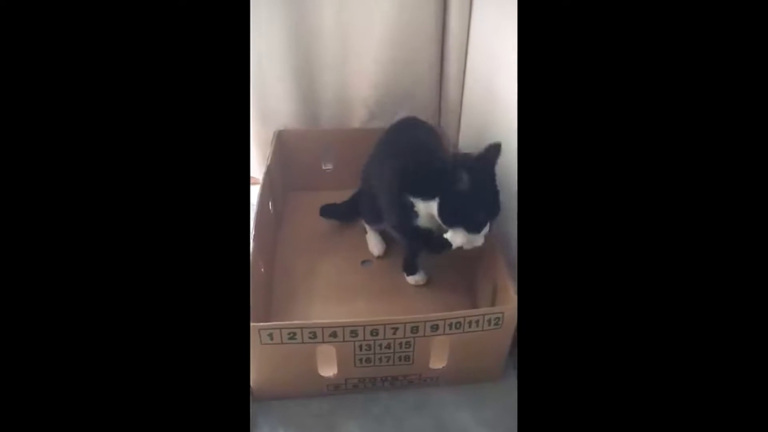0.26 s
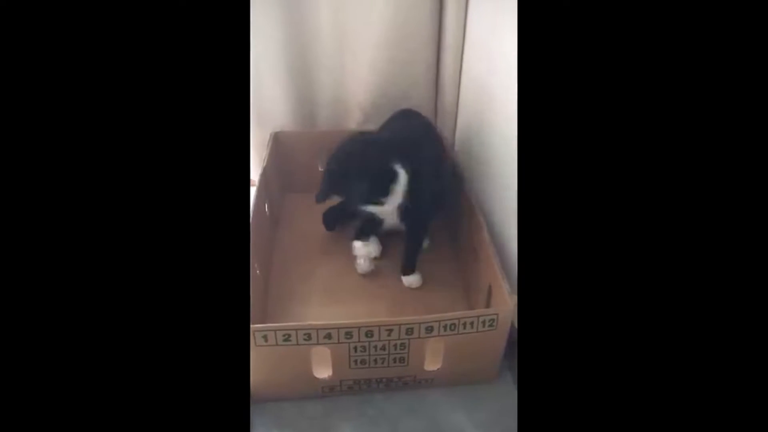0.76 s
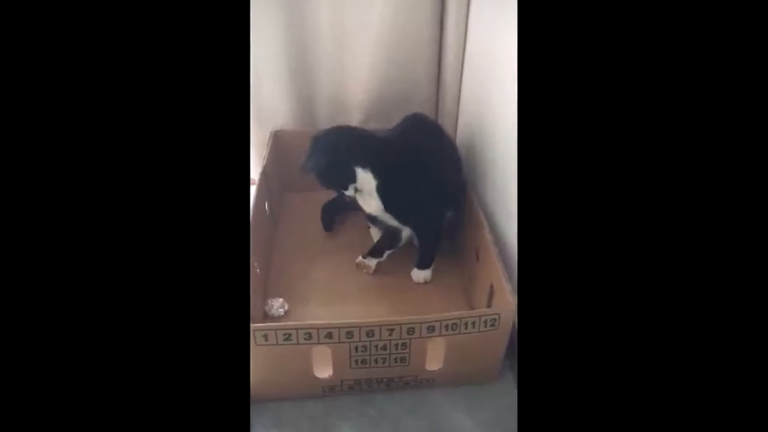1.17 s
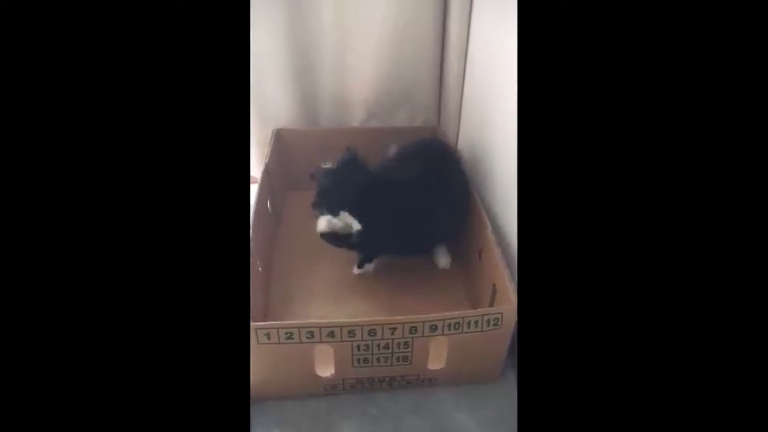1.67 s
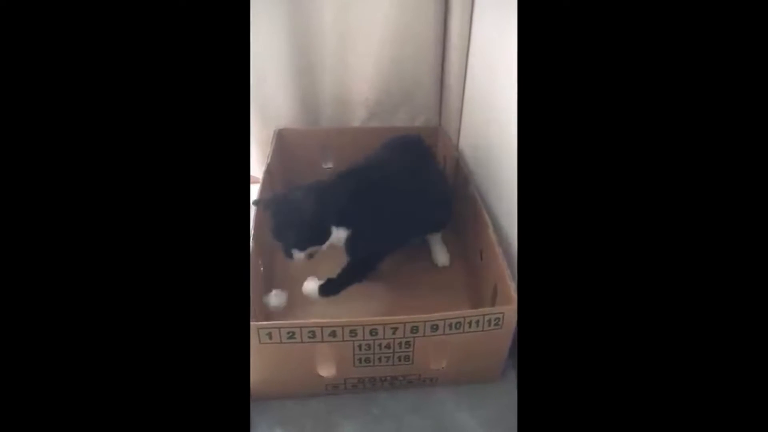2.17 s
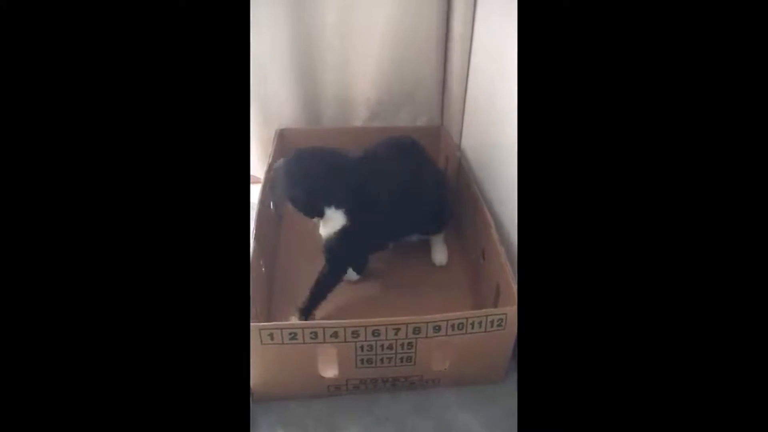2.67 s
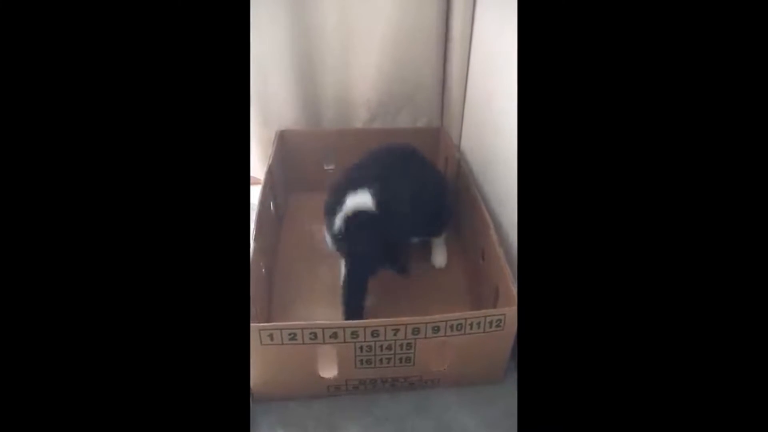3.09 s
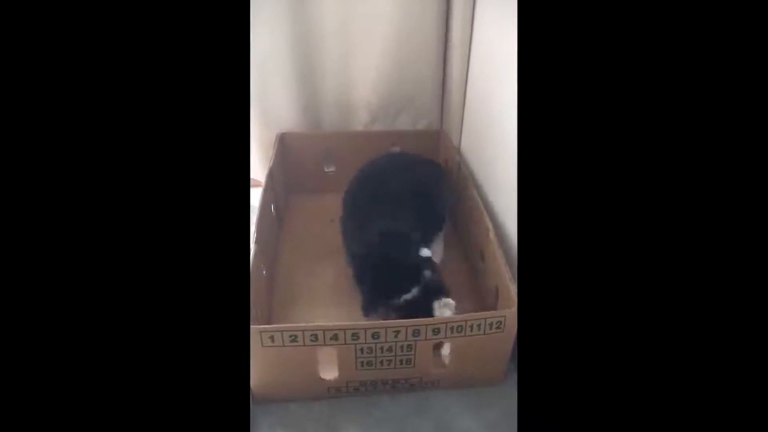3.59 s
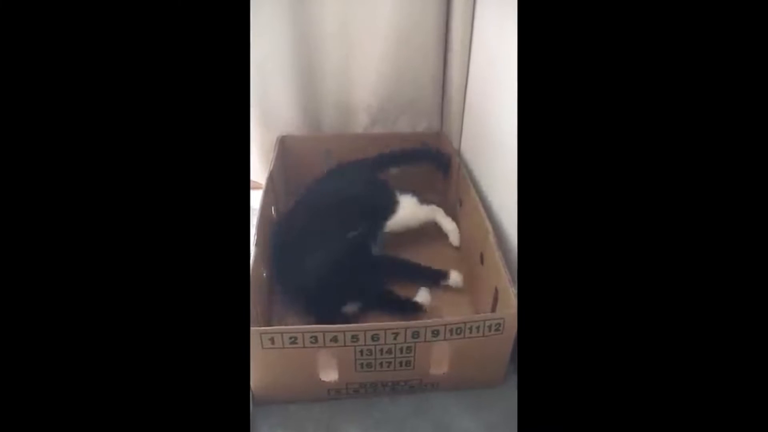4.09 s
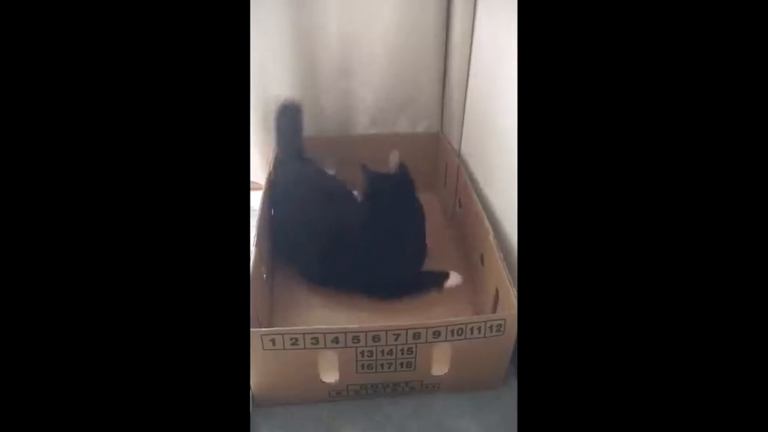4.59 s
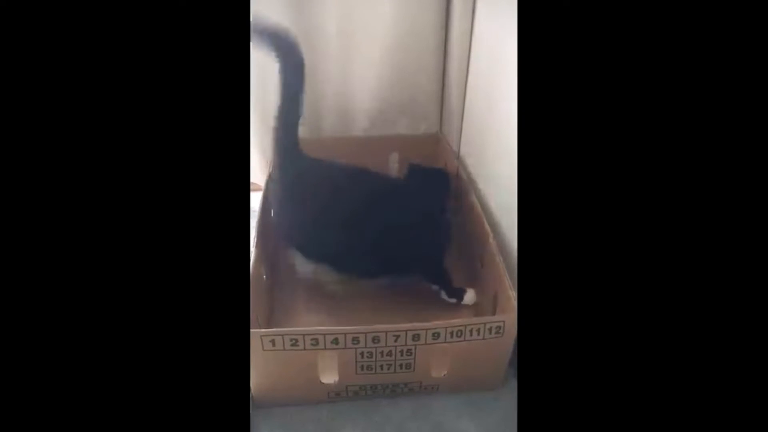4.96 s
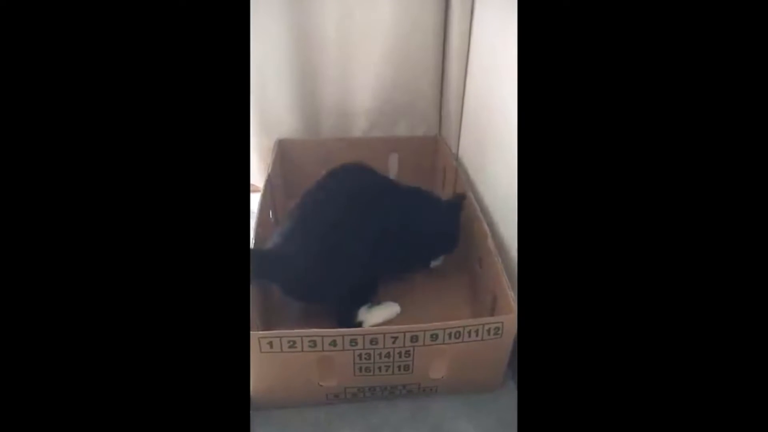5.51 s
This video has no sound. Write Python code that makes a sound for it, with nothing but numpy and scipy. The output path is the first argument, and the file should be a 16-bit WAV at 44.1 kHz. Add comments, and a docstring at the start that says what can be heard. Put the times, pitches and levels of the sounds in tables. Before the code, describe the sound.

A phone about a step away picks up a cardboard box being knocked and scratched by a cat and its ball. Isolated clacks and faint rolling give way to quick rattling bursts, dull panel thuds, gritty claw drags and tiny squeaks, densest in the second half, before fading to faint ticks over soft room rumble.

```python
"""First a low room rumble and faint fur hiss, then a cat chases a small hard ball around an open cardboard box.
Ball, paws and claws knock the panels: pushed modes ring, then loose board shudders as dull, dying noise.
Hard knocks carry short pitched rings of struck board, and low thuds join; rolling drives the modes with grit.
Claws and fur scrape the board as filtered grit in clumps, with snags, tearing and short squeaks.
A phone a step away picks it up with the room's echoes and rounds off the loudest knocks."""
import sys
import numpy as np
from scipy import signal
from scipy.fft import rfft, irfft
from scipy.io import wavfile

SR = 44100
rng = np.random.default_rng(int(sys.argv[2]) if len(sys.argv) > 2 else 0)


def master(y):
    """Save y as 16-bit WAV."""
    cut = np.clip(np.atleast_2d(y).T, -1, 1)
    pcm = np.round(cut * 32767)  # scale
    wavfile.write(sys.argv[1], SR, pcm.astype(np.int16))


N = 253001

# Knocks of ball, paw and claw; boom, rap and tick are relative to the level:
# (time [s], level [dB], boom of big panels [dB], rap of the edge [dB], surface tick [dB], panel pitch [Hz])
KNOCKS = [(0.438, -39, -7, 20, -5, 1080), (0.584, -11, -5.5, 1.5, 0, 910), (0.718, -21.5, 1, 0.5, 0, 510),
          (0.798, -30.5, 6, 6.5, 4, 500), (0.856, -34, 7.5, 0, -2, 510), (0.897, -30.5, -4, -29, -5, 490),
          (0.936, -29.5, -2, -15, 2, 704), (0.963, -24, -24, 11.5, 4.5, 1180),
          (1.074, -18.5, -5, -22, 0, 580), (1.129, -19.5, -19, -13, -5, 540), (1.181, -34, 1, 8, 6, 444),
          (1.195, -35.5, 0, -12, 12, 614), (1.287, -39.5, 5.5, 12, -13, 394),
          (1.486, -22.5, -6, 9, -17, 910), (1.505, -9.5, 1.5, -0.5, -2, 690),
          (1.673, -31, -2, -20, -11, 950), (1.724, -30.5, 10, -4, -1, 430), (2.058, -23, -5, 14, -8, 1430),
          (2.071, -36.5, -3.5, -5, -19, 1520), (2.313, -29.5, 3, 3, 10.5, 610),
          (2.376, -10, -13, -10, -3, 744), (2.391, -17, -20, -18, -15, 830),
          (2.404, -15.5, -22, -20, -28, 620), (2.48, -17, -27, -1.5, -3, 710),
          (2.493, -24, -1, -17, -13, 855), (2.509, -25, -22, -34, -29, 794), (2.661, -32, -7, 5, 9.5, 1390),
          (2.678, -18.5, 0.5, -12, 1, 450), (2.717, -25, -18, -16, -13, 1470),
          (2.743, -21, 0, -17, 0, 1180), (2.794, -28, -6, 2, -17, 1560), (2.872, -29, -18, 9, 3.5, 1450),
          (2.887, -17, -3, 14.5, -7, 1520), (2.898, -9.5, -3, -13, -7.5, 496),
          (2.914, -20.5, -1, 16.5, -21, 1360), (3.04, -14, -8, -27, 1, 770),
          (3.059, -10, -31, -14, -5.5, 1010), (3.073, -18, -22, -12, -12, 890),
          (3.125, -21.5, -20, 3, -8, 1140), (3.239, -22.5, -21, -14, 1.5, 577),
          (3.295, -10, -5, 0.5, -8, 666), (3.373, -20.5, 6, 15, 2, 1660), (3.422, -9, -26, -2, -11.5, 650),
          (3.438, -13, -13, -8, -6, 684), (3.465, -5, -25, 2, -4, 1500),
          (3.711, -27.5, -11, -20, -29, 1160), (3.84, -12.5, -27, -5.5, -11.5, 513),
          (3.877, -22, -27, 1, 1, 434), (3.926, -29, -17, 5, -22, 414), (3.949, -6.5, -12, -1.5, -20, 850),
          (3.962, -5.5, -26, -22, -10, 1050), (3.983, -17, -18, -12, 0, 476), (4.01, -11, -8, 3.5, -5, 766),
          (4.136, -10.5, -30, 9, -1.5, 1170), (4.144, -7.5, -8, -10, -11, 935),
          (4.249, -15, -5, -20, -9, 416), (4.333, -13, -23, 3, -11, 1350),
          (4.335, -9.5, -39, -10, -8, 1220), (4.343, -24.5, -32, 15.5, -22, 1490),
          (4.388, -13, -37, -22, -7, 645), (4.448, -12, 14, 5.5, -8, 400),
          (4.481, -16.5, -21, -14, -5, 1150), (4.544, -26.5, 1, 9, 2, 1440),
          (4.748, -6.5, -32, -11, -34, 583), (4.799, -33, 19.5, 11, -1, 457),
          (4.825, -10, -1, 6.5, 0, 1270), (4.986, -19.5, -40, 8, -4, 1080),
          (5.035, -34, -23, -15, -15, 1210), (5.05, -10.5, -15, -19, -7, 965),
          (5.064, -10, -21, 2.5, -10, 866), (5.137, -12, 2, 3.5, -4, 760), (5.169, -19, -17, -25, -21, 434),
          (5.205, -10, -25, 1, -31, 840), (5.213, -9.5, -20, -20, -28, 770),
          (5.234, -13, -19, -11, -2, 483), (5.32, -18, -1, 9, -10, 643), (5.455, -33, -19, 12, -6, 400)]
# Modes of the cardboard box: (frequency [Hz], relative level [dB], t60 [s])
BOX_MODES = [(166, 2, 0.0041), (225.6, -8, 0.059), (280, -1.5, 0.065), (358.3, -13, 0.25),
             (414, 2.5, 0.018), (483.5, -18.5, 0.14), (561, -13, 0.14), (658, -7, 0.078), (710, -45, 0.045),
             (863.7, -5.5, 0.054), (930.6, -13.5, 0.1), (1070, 0, 0.021), (1438, -6.5, 0.032),
             (1660, -9.5, 0.041), (2130, -17, 0.026), (2520, -9, 0.0063), (2980, 3.5, 0.00024)]
KNOCK_S = 0.0024   # decay constant of the contact
KNOCK_SCATTER_DB, KNOCK_DRIVE_DB = 1, 4.5   # spread from mode to mode; drive added to every mode
LOAD_DETUNE = 0.05   # the shifting cat bends every mode by about this share from knock to knock
SPOT_DB, SPOT_T60_S = -2.5, 0.025   # short ring of the board right under the blow


def knocks(size=6144):
    """Where a knock lands sets which modes it wakes; the load on the box detunes them each time."""
    blows = contacts(np.full(len(KNOCKS), KNOCK_S), chatter=0.082)
    scatter, bend = rng.standard_normal((len(KNOCKS), len(BOX_MODES), 2)).T[..., None]
    _, knock_db, *_, panel_hz = np.transpose(KNOCKS)[..., None]
    spot = from_db(knock_db + SPOT_DB) * response(panel_hz, SPOT_T60_S, size)
    body = 0
    for k, (hz, level_db, t60) in enumerate(BOX_MODES):
        strength = from_db(level_db + KNOCK_SCATTER_DB * scatter[k] + KNOCK_DRIVE_DB)
        gain = mode_sign(k) * reach(hz)[:, None] * strength
        body = body + gain * response(hz * (1 + LOAD_DETUNE * bend[k]), t60, size)
    # the box gets the full contact, the spot a bare click
    rows = irfft(rfft(blows, size) * body + spot, size)
    return train(KNOCKS, rows, np.ones(len(KNOCKS)))


BOOM_HZ, RAP_HZ = 281, 2185   # centres of boom and rap
BOOM_SLOPE_DB, PANEL_SLOPE_DB, RAP_SLOPE_DB = 10, 12, 14   # loss per octave away from the centre


def reach(hz):
    """How strongly each knock drives a mode: boom and panel fall off both ways, the rap only downwards."""
    _, knock_db, boom_db, rap_db, _, panel_hz = np.transpose(KNOCKS)
    boom = from_db(boom_db - BOOM_SLOPE_DB * abs(np.log2(hz / BOOM_HZ)))
    panel = from_db(-PANEL_SLOPE_DB * abs(np.log2(hz / panel_hz)))
    rap = from_db(rap_db - RAP_SLOPE_DB * max(0, np.log2(RAP_HZ / hz)))
    return from_db(knock_db) * np.sqrt(boom ** 2 + panel ** 2 + rap ** 2)


PUSH_CYCLES = 0.19   # a paw or ball pushes each mode with a time constant of this share of its cycle


def push_pole(hz):
    """Low-pass pole of a soft push: the force fades over a share of the mode's cycle."""
    return np.exp(-hz / (PUSH_CYCLES * SR))


def response(hz, t60, size):
    """Spectrum of a mode pushed softly: a low-passed click into a dying sine."""
    z = np.exp(-2j * np.pi * np.arange(size // 2 + 1) / size)
    r, w = from_db(-60 / (t60 * SR)), 2 * np.pi * hz / SR
    soft = push_pole(hz)
    push = 1.07 * (1 - soft) / (1 - soft * z)
    return push * np.sin(w) * z / (1 - 2 * r * np.cos(w) * z + (r * z) ** 2)


def mode_sign(k):
    """Neighbouring pairs of modes move the near wall in opposite senses."""
    return (-1) ** (k // 2)


SHUDDER_DB = -19.5   # relative to the knock
SHUDDER_T60_S, SHUDDER_RISE_S, SHUDDER_HZ = 0.3, 0.0075, (227, 1080)   # decay, rise constant, band
# Hollow of the box, resonances added to the shudder: (frequency [Hz], width [Hz], added level [dB])
HOLLOW = [(282, 100, 6), (434, 35, 8), (602, 38, 4), (852, 150, 11)]


def shudder():
    """After each knock loose flaps and walls rumble as dull, dying noise in the hollow, new every time."""
    t = np.arange(SR // 4) / SR
    band = signal.butter(2, SHUDDER_HZ, "band", fs=SR, output="sos")
    noise = signal.sosfilt(band, rng.standard_normal((len(KNOCKS), len(t))))
    hollow = noise.copy()
    for hz, width_hz, level_db in HOLLOW:
        hollow += from_db(level_db) * signal.lfilter(*signal.iirpeak(hz, hz / width_hz, fs=SR), noise)
    envelope = from_db(-60 * t / SHUDDER_T60_S) * (1 - np.exp(-t / SHUDDER_RISE_S))
    return train(KNOCKS, rms_one(hollow) * envelope, from_db(np.transpose(KNOCKS)[1] + SHUDDER_DB))


def rolling(rumble_db):
    """The rolling ball meets uneven grit, whose lumpy force keeps the box modes ringing."""
    grain = from_db(rumble_db - 27.5 + 0.3 * lumps(64.0)) * grit(900.0, spread_db=9.0)
    out = np.zeros(N)
    for k, (hz, level_db, t60) in enumerate(BOX_MODES):
        soft = push_pole(hz)
        drive = 1.14 * (1 - soft) * min(1, (900 / hz) ** 2)   # weaker above 900 Hz
        force = signal.lfilter([drive], [1, -soft], grain)
        out += mode_sign(k) * from_db(level_db) * ring(force, hz, t60)
    return out


def box(rumble_db):
    """Knocks, shudder and rolling leave the box; thin panels radiate little deep bass."""
    out = knocks() + shudder() + rolling(rumble_db)
    return signal.sosfilt(signal.butter(2, 130, "high", fs=SR, output="sos"), out)


# Short pitched rings of struck board under hard knocks, and low thuds:
# (time [s], peak level [dB], pitch [Hz], t60 [s])
RINGS_AND_THUDS = [(0.5855, -5, 524, 0.018), (0.588, -28.5, 194, 0.049), (1.505, -18.5, 248, 0.03),
                   (1.57, -30, 307, .06), (1.722, -25, 170, 0.062), (1.729, -26, 281, 0.093),
                   (1.739, -36.5, 65.4, 0.079), (2.071, -37, 122, 0.048), (2.317, -28, 273, 0.11),
                   (2.362, -32, 280, 0.069), (2.377, -18.5, 728, 0.057), (2.378, -17, 1515, 0.018),
                   (2.38, -23, 279, 0.075), (2.389, -19.5, 850, 0.053), (2.682, -23.5, 268, 0.23),
                   (3.296, -13.5, 710, 0.03), (3.3, -21, 394, 0.054), (3.378, -19, 230, 0.028),
                   (3.4235, -4.5, 618, 0.02), (3.466, -5, 1390, 0.023), (3.949, -1, 480, 0.0097),
                   (3.952, -16.5, 178, 0.022), (3.988, -17, 470, 0.019), (3.995, -13.5, 288, 0.071),
                   (4.1363, -5, 1100, 0.0086), (4.252, -12.5, 305, 0.11), (4.349, -35, 77, 0.043),
                   (4.434, -25, 109, 0.034), (4.449, -3, 371, 0.033), (4.481, -12.5, 1150, 0.018),
                   (4.789, -34, 77.4, .075), (4.83, -29.5, 77, 0.05), (5.051, -7.5, 940, 0.023),
                   (5.052, -9.5, 298, 0.13), (5.063, -11.5, 900, 0.05), (5.066, -10.5, 308, 0.061),
                   (5.14, -17, 294, 0.069), (5.176, -29.5, 120, 0.035), (5.238, -13, 267, 0.11),
                   (5.327, -19.5, 272, 0.077), (5.338, -26.5, 134, 0.045)]
RING_RISE_CYCLES = 0.51   # time constant of the build-up


def rings_and_thuds():
    """Each is a single sine that builds within about a cycle and dies away."""
    t = np.arange(SR // 5) / SR
    _, peak_db, hz, t60 = np.transpose(RINGS_AND_THUDS)[..., None]
    envelope = from_db(-60 * t / t60) * (1 - np.exp(-t * hz / RING_RISE_CYCLES))
    rows = np.sin(2 * np.pi * hz * t) * envelope
    return train(RINGS_AND_THUDS, peak_one(rows), from_db(peak_db))


# Lone claw snags: (time [s], peak level [dB], brightest frequency [Hz])
SNAGS = [(0.426, -26, 5830), (0.9164, -44, 3280), (0.9824, -22, 5460), (0.994, -45, 7500),
         (1.016, -25, 3960), (1.0277, -22.5, 10000), (1.044, -21.5, 2440), (1.141, -33, 5000),
         (1.1583, -36, 6500), (1.194, -29, 4870), (1.229, -29, 3250), (1.248, -36, 3320),
         (1.268, -31, 3040), (1.2836, -32, 3420), (1.617, -35, 5500), (1.6726, -37, 6040),
         (2.4958, -27, 4830), (2.542, -37, 2980), (2.568, -36, 2950), (2.588, -32, 3340),
         (2.6003, -24, 5900), (2.6206, -20, 9300), (2.6474, -33, 3000), (2.7, -27, 3390),
         (2.8374, -18.5, 3550), (2.9756, -30, 3330), (3.2515, -27, 6470), (3.5372, -25, 5700),
         (3.56, -23, 3540), (4.0605, -19.5, 4960), (4.09, -24, 5330), (4.105, -30, 2740),
         (4.341, -16, 3180), (4.364, -34, 5500), (4.3835, -18, 3900), (4.603, -29, 3370),
         (4.6227, -35, 7240), (5.0135, -27, 3530), (5.592, -28.5, 6260), (5.636, -35, 3670),
         (5.702, -40, 6310), (5.7176, -37, 3600), (5.7314, -36, 7160)]
SNAG_S, SNAG_SHARPNESS = 0.0031, 14.0   # decay constant; quality factor of the bright spot
KNOCK_TICK_S, KNOCK_TICK_SHARPNESS, KNOCK_TICK_HZ = 0.0039, 3.0, 3140   # those that come with a knock
TICK_RISE_S = 0.00013   # fibres tear one after another


def ticks():
    """Short bursts of tearing fibre, alone or on top of a knock, each with a bright spot."""
    events = [(*row, SNAG_SHARPNESS, SNAG_S) for row in SNAGS]
    for s, level_db, _, _, tick_db, _ in KNOCKS:
        events.append((s, level_db + tick_db, KNOCK_TICK_HZ, KNOCK_TICK_SHARPNESS, KNOCK_TICK_S))
    _, peak_db, bright_hz, sharpness, decay_s = np.transpose(events)
    rise = 1 - np.exp(-np.arange(1, SR // 25 + 1) / (TICK_RISE_S * SR))
    treble = signal.butter(2, 2000, "high", fs=SR, output="sos")
    bursts = signal.sosfilt(treble, contacts(decay_s, chatter=0.81) * rise)
    for burst, hz, q in zip(bursts, bright_hz, sharpness):
        burst += 0.63 * q * signal.lfilter(*signal.iirpeak(hz, q, fs=SR), burst)
    return train(events, peak_one(bursts), from_db(peak_db))


# Shuffling of cat and ball, as curves:
# (time [s], fur hiss level [dB], relative rumble level of rolling and shoving [dB])
SHUFFLING = [(0.0, -67.5, -70), (0.4, -65.5, -83), (0.62, -67, -51), (0.75, -70, -59), (0.96, -63, -31),
             (1.13, -65, -30.5), (1.32, -60.5, -36.5), (1.71, -56, -81), (1.87, -59.5, -48),
             (2.15, -64.5, -60), (2.36, -74, -56), (2.49, -63.5, -38), (2.82, -49, -36.5), (3.09, -49, -28),
             (3.4, -49.5, -29), (3.57, -76, -59), (3.85, -43, -36), (4.04, -50.5, -48), (4.37, -45, -19.5),
             (4.6, -43.5, -30.5), (4.82, -47.5, -37), (5.19, -45, -35), (5.49, -51, -57),
             (5.73, -58, -44.5)]


def shuffling():
    """Hiss and rumble levels glide from point to point as cat and ball move."""
    s, *columns = np.transpose(SHUFFLING)
    return [np.interp(np.arange(N) / SR, s, column) for column in columns]


# Spectra of board surface, dragging rasp and tearing: (frequency [Hz], relative density [dB per Hz])
HISS_SPECTRUM = [(1500, 3), (3000, 6.5), (4700, 4), (5300, 6), (8300, 5.5), (10300, 0.5), (11500, 2),
                 (13500, 8)]
RASP_SPECTRUM = [(600, 16.5), (1200, 11.5), (1700, 13.5), (2400, 8.5), (3500, 3.5), (6000, -66)]
TEAR_SPECTRUM = [(600, -7), (1200, 23), (2400, -7.5), (4500, 8), (8000, -10)]
RASP_DB, RASP_FROM_RUMBLE = -4, 0.33   # the rasp follows a level between hiss and rumble, then this offset
CRACKLE_DB = -7   # relative to the hiss
TEAR_PER_S, TEAR_DB = 820, -6   # coarse tearing, relative to the rasp of the strokes


def scraping(hiss_db, rumble_db):
    """Fine dense grit gives the hiss, coarser slips the rasp, sparse snags the crackle; all in clumps."""
    rasp_db = RASP_DB + hiss_db + RASP_FROM_RUMBLE * (rumble_db - hiss_db)
    grip = lumps(100.0)
    stroke_hiss, stroke_rasp = strokes()
    hiss_gain = from_db(hiss_db) + stroke_hiss
    rasp_gain = from_db(rasp_db) + stroke_rasp
    hiss = coloured(grit(6000.0, spread_db=-9.5), HISS_SPECTRUM) * from_db(0.23 * grip)
    rasp = coloured(grit(1500.0, spread_db=2.5), RASP_SPECTRUM) * from_db(1.54 * (grip + lumps(73.0)))
    out = hiss_gain * from_db(CRACKLE_DB) * crackle()
    tearing = coloured(grit(TEAR_PER_S, spread_db=2.0), TEAR_SPECTRUM)
    out += stroke_rasp * from_db(TEAR_DB) * patchy(tearing, flicker_db=2.5)
    out += hiss_gain * patchy(hiss, flicker_db=3.5)
    return out + rasp_gain * patchy(rasp, flicker_db=2.0)


# Claw strokes, levels at the bite: (time [s], length [s], hiss level [dB], rasp level [dB])
STROKES = [(0.423, 0.024, -38, -60), (0.958, 0.2, -38, -41), (1.22, 0.1, -49, -44),
           (1.439, 0.015, -55.5, -83), (1.484, 0.035, -30, -31), (1.529, 0.042, -30, -67),
           (1.56, 0.017, -40, -62), (1.812, 0.023, -41.5, -47.5), (1.896, 0.024, -44.5, -67),
           (1.987, 0.021, -50.5, -73), (2.358, 0.0061, -32.5, -67), (2.598, 0.029, -38, -66),
           (2.715, 0.023, -32, -33), (2.815, 0.046, -37.5, -42), (2.882, 0.05, -36, -19.5),
           (3.027, 0.014, -29, -35), (3.04, 0.086, -36, -24.5), (3.159, 0.03, -31.5, -39),
           (3.242, 0.068, -45.5, -48), (3.363, 0.045, -38.5, -26), (3.46, 0.05, -35.5, -24),
           (3.513, 0.1, -40, -31), (3.526, 0.034, -39.5, -37), (3.709, 0.073, -57, -49),
           (3.95, 0.12, -42, -26.5), (4.153, 0.018, -42, -30), (4.175, 0.12, -35.5, -23.5),
           (4.331, 0.17, -32, -23), (4.499, 0.091, -44, -26.5), (4.608, 0.026, -36.5, -35),
           (4.636, 0.022, -38.5, -65), (4.739, 0.018, -34, -23), (4.882, 0.28, -45.5, -33.5),
           (5.021, 0.077, -36, -26), (5.216, 0.036, -36.5, -28), (5.254, 0.069, -30, -40),
           (5.59, 0.0065, -32, -37.5), (5.617, 0.026, -45, -41)]
STROKE_EDGE_S = 0.0039   # time constant of bite and release
HISS_FADE_DB_PER_S, RASP_FADE_DB_PER_S = 83, 183   # the claw loses grip along a stroke
DIG_FADE_PER_S = 4.5   # extra hiss fade [dB/s] per dB of rasp above hiss: digging dies, gliding holds
GLIDE_RISE_S = 0.0011   # time constant of the slight swell of the hiss


def strokes():
    """Hiss and rasp gain of the claw strokes: a quick bite, a fading drag, a quick release."""
    t, gains = np.arange(N) / SR, np.zeros((2, N))
    for s, length_s, hiss_db, rasp_db in STROKES:
        during = slice(round(s * SR), round((s + length_s) * SR))
        since = t[during] - s
        fade = max(0, HISS_FADE_DB_PER_S + DIG_FADE_PER_S * (rasp_db - hiss_db))
        swell = 1 - 0.15 * np.exp(-since / GLIDE_RISE_S)
        gains[0, during] += from_db(hiss_db - fade * since) * swell
        gains[1, during] += from_db(rasp_db - RASP_FADE_DB_PER_S * since)
    r = np.exp(-1 / (STROKE_EDGE_S * SR))
    return signal.lfilter([1 - r], [1, -r], gains)


def crackle():
    """Each snagged fibre rings a few cycles at one of ten pitches; rms 1."""
    snaps = grit(400, spread_db=2.5)
    dealt = rng.integers(0, 10, N)
    pitches = np.geomspace(1600, 9000, 10)
    return rms_one(sum(ring(snaps * (dealt == k), hz, 25.0 / hz) for k, hz in enumerate(pitches)))


def patchy(x, flicker_db):
    """Each third of an octave or so swells and fades on its own as the claw meets other fibres; rms 1."""
    edges = np.geomspace(500, 14000, 15)
    out = np.zeros(N)
    for k, edge in enumerate(zip(edges, edges[1:])):
        band = signal.sosfilt(signal.butter(2, edge, "band", fs=SR, output="sos"), x)
        out += (-1) ** k * from_db(flicker_db * lumps(40.0)) * band
    return rms_one(out)


# Claw squeaks: (time [s], length [s], peak level [dB], pitch [Hz])
SQUEAKS = [(1.13, 0.0035, -29, 3500), (2.82, 0.0092, -28, 1700), (4.06, .006, -46, 4960),
           (4.643, 0.018, -30.5, 6000), (5.221, 0.013, -27.5, 3990)]


def squeaks():
    """Quick stick and slip: a short, slightly wavering whistle."""
    t = np.arange(SR // 40) / SR
    _, length_s, peak_db, hz = np.transpose(SQUEAKS)[..., None]
    waver = 0.046 * np.cumsum(rng.standard_normal((len(SQUEAKS), len(t))), axis=1)
    swell = np.sin(np.pi * np.minimum(t / length_s, 1))
    return train(SQUEAKS, np.sin(2 * np.pi * hz * t + waver) * swell, from_db(peak_db))


ROOM_T60_S, TREBLE_T60_S, WALL_CUT_HZ = 0.49, 0.32, 1800


def room(x):
    """Dense reflections; the walls swallow the treble sooner."""
    lows = signal.lfilter(*signal.butter(1, WALL_CUT_HZ, fs=SR), x)
    low_tail = tail(lows, ROOM_T60_S, start_s=0.013)
    return low_tail + 0.54 * tail(x - lows, TREBLE_T60_S, start_s=0.0047)


SPOT_CHANGE_S = 0.19   # the action moves on this often, and the next echo pattern takes the lead


def tail(x, t60, start_s):
    """Smears x with dying noise of energy 1; three echo patterns take turns as the cat moves about."""
    t = np.arange(SR // 3) / SR
    turn = np.arange(N) / (SPOT_CHANGE_S * SR)
    echoes = rng.standard_normal((3, len(t))) * from_db(-60 * t / t60) * (1 - np.exp(-t / start_s))
    echoes /= np.sqrt(np.sum(echoes ** 2, axis=1, keepdims=True))
    shares = np.sqrt(2 / 3) * np.abs(np.cos(np.pi * (turn - np.arange(3)[:, None]) / 3))
    return signal.oaconvolve(x * shares, echoes, axes=1).sum(axis=0)[:N]


# Spectrum of the quiet room: (frequency [Hz], relative density [dB per Hz])
ROOM_TONE = [(12, -30), (20, -34), (37, -3), (86, 0), (141, -5), (157, -4), (195, -12.5), (503, -25.5),
             (913, -26.5), (3950, -34), (13000, -75)]


def room_tone():
    """Steady noise, mostly low rumble, at a fixed rms level."""
    return from_db(-51.5) * coloured(rng.standard_normal(N), ROOM_TONE)


def from_db(db):
    """Gain of a level."""
    return 10 ** (np.asarray(db) / 20)


def rms_one(x):
    """Scaled to rms 1."""
    return x / np.sqrt(np.mean(x ** 2) + 1e-20)


def peak_one(rows):
    """Each row scaled to peak 1."""
    return rows / np.max(np.abs(rows), axis=1, keepdims=True)


def coloured(x, spectrum):
    """Shapes x by a smooth spectrum; rms 1."""
    hz, level_db = np.transpose(spectrum)
    bins = np.arange(N // 2 + 1) * SR / N + 1
    gain = from_db(np.interp(np.log(bins), np.log(hz), level_db))
    return rms_one(irfft(rfft(x) * gain, N))


def ring(force, hz, t60):
    """A resonator: a unit click sets a dying sine of height 1 ringing."""
    r, w = from_db(-60 / (t60 * SR)), 2 * np.pi * hz / SR
    return signal.lfilter([0, np.sin(w)], [1, -2 * r * np.cos(w), r * r], force + 1e-18)


def grit(per_s, spread_db):
    """Fibres catching at random moments with uneven sizes; rms 1."""
    sizes = from_db(spread_db * np.minimum(rng.exponential(1, N), 5)) * rng.choice([-1, 1], N)
    return rms_one(sizes * (rng.random(N) < per_s / SR))


def lumps(corner_hz):
    """Slow chance, spread 1: a drag grips and slips, as low-passed noise drawn every 8 samples."""
    r = np.exp(-16 * np.pi * corner_hz / SR)
    slow = rms_one(signal.lfilter([1], [1, -2 * r, r * r], rng.standard_normal(N // 8 + 2)))
    return np.interp(np.arange(N) / 8, np.arange(len(slow)), slow)


def contacts(decays_s, chatter):
    """One row per contact: a click, then chatter that dies away; energy 1."""
    t = np.arange(SR // 25) / SR
    fade = np.exp(-t / np.clip(decays_s, 3e-4, .02)[:, None])
    rows = chatter * rng.standard_normal((len(decays_s), len(t))) * fade
    rows[:, 0] = 1
    return rows / np.sqrt(np.sum(rows ** 2, axis=1, keepdims=True))


def train(events, rows, gains):
    """Lays the rows out at the event times."""
    out = np.zeros(N + rows.shape[1])
    for (s, *_), row, gain in zip(events, rows, gains):
        at = round(s * SR)
        out[at:at + len(row)] += gain * row
    return out[:N]


ROOM_DB = -11   # level of the reflections
RINGS_ROOM_DB = -4   # level at which the pitched rings and thuds feed the echoes


def scene():
    """Box, squeaks, ticks, scraping, rings and thuds with their reflections, over the room tone."""
    hiss_db, rumble_db = shuffling()
    play = box(rumble_db) + squeaks() + ticks() + scraping(hiss_db, rumble_db)
    tone = room_tone()
    rings = rings_and_thuds()
    reflections = from_db(ROOM_DB) * room(play + from_db(RINGS_ROOM_DB) * rings)
    return (play + rings + reflections + tone)[None]


CEILING, CUTOFF_HZ = 0.72, 13550   # peaks bend towards the ceiling; 50 dB down from the cutoff up


def record(dry):
    """The phone rounds the peaks and cuts the top."""
    rounded = dry / (1 + np.abs(dry / CEILING) ** 8) ** (1 / 8)
    return signal.sosfilt(signal.cheby2(14, 50, CUTOFF_HZ, fs=SR, output="sos"), rounded)


dry = scene()
out = record(dry)
master(out)
```